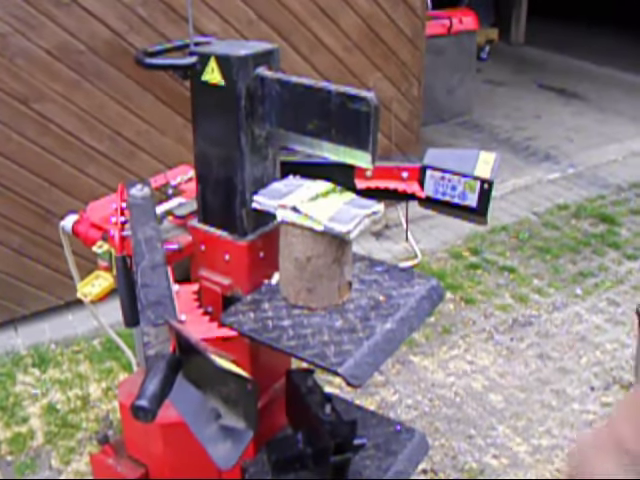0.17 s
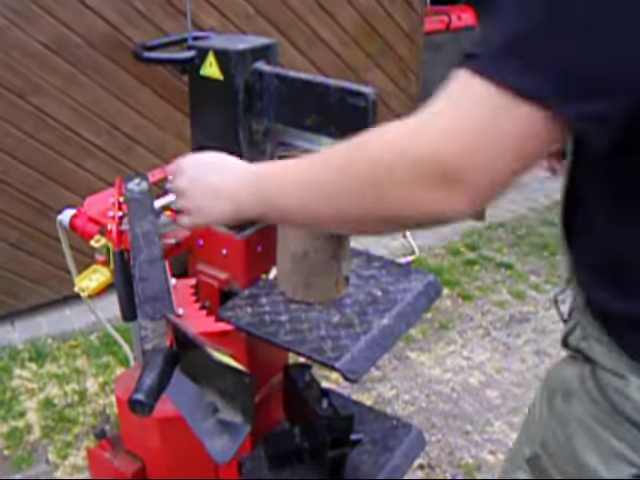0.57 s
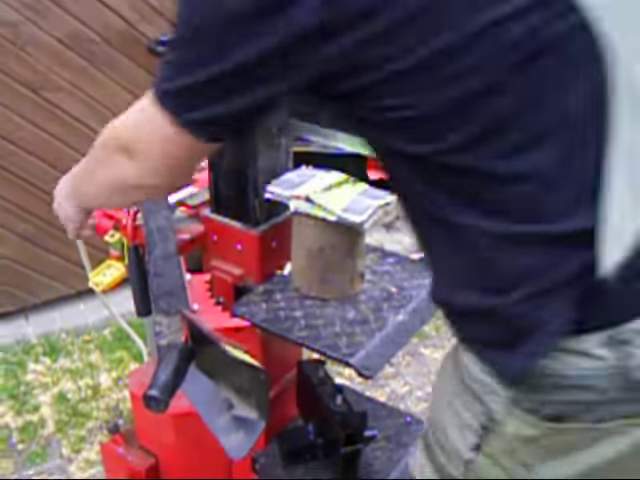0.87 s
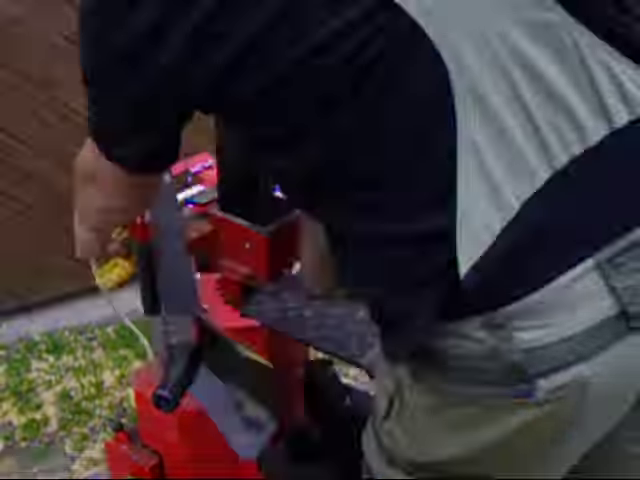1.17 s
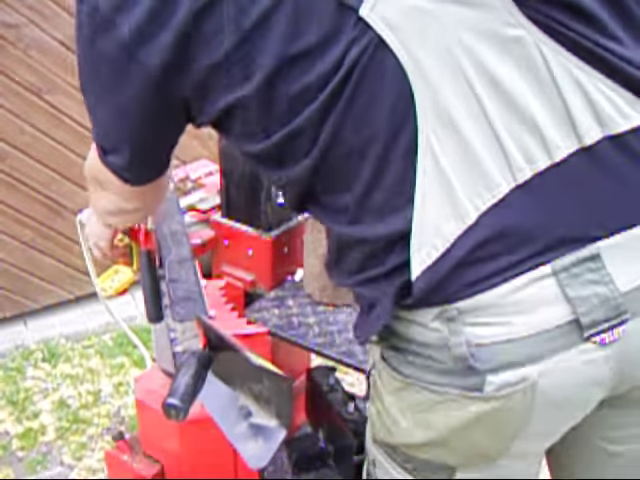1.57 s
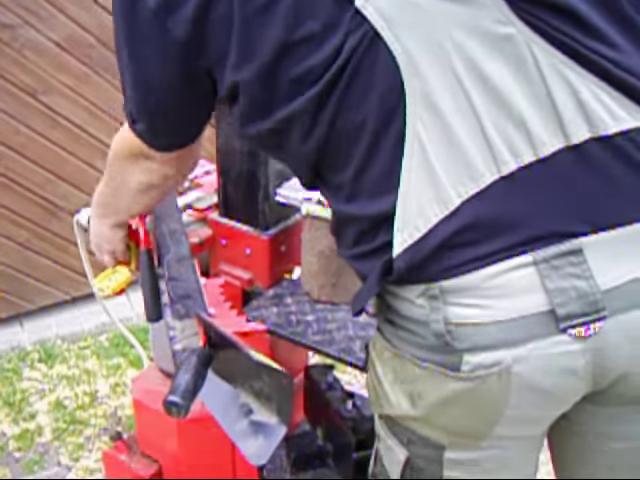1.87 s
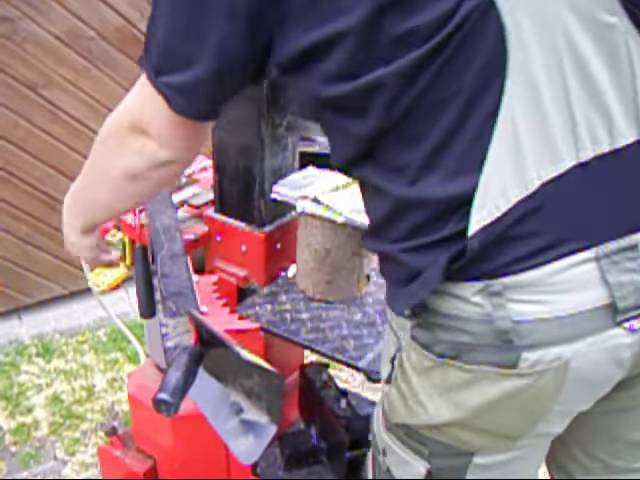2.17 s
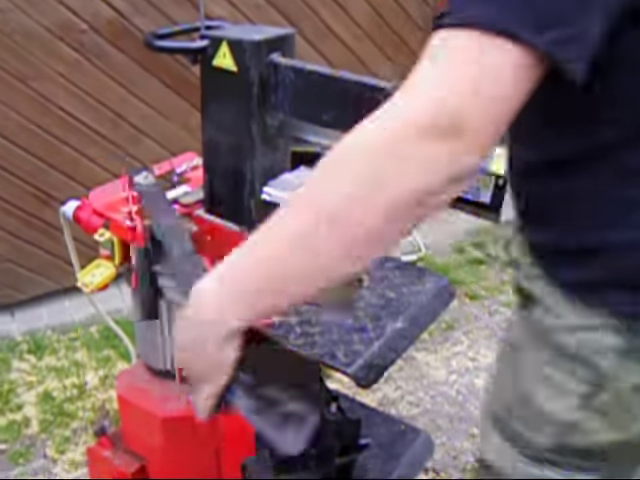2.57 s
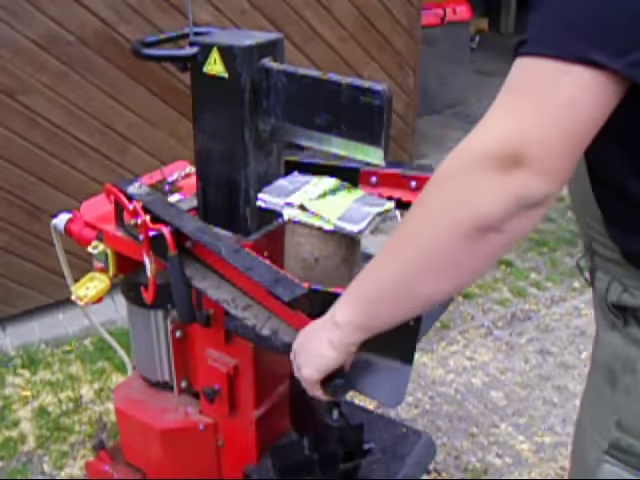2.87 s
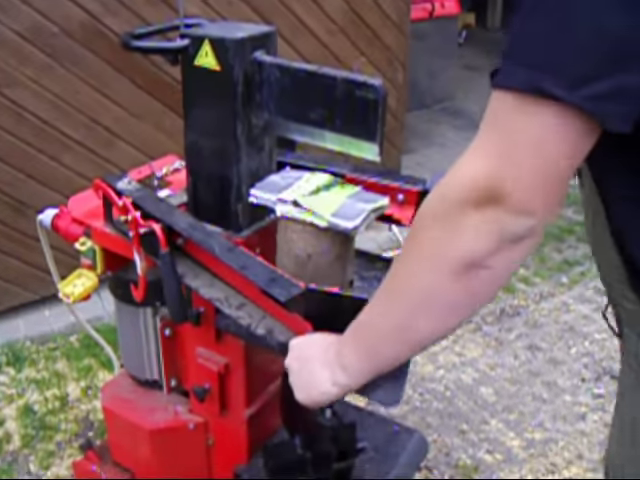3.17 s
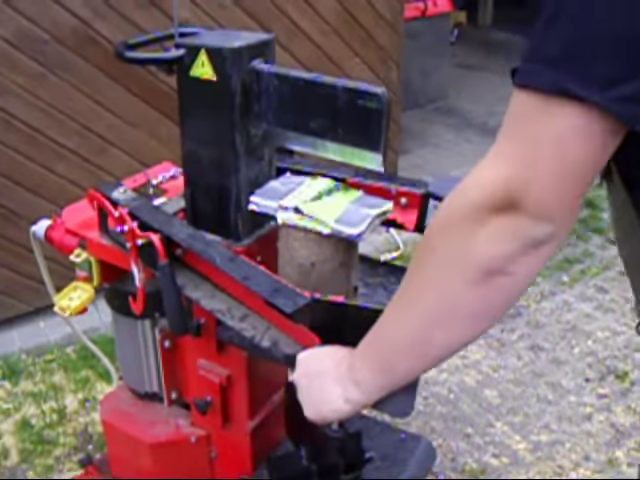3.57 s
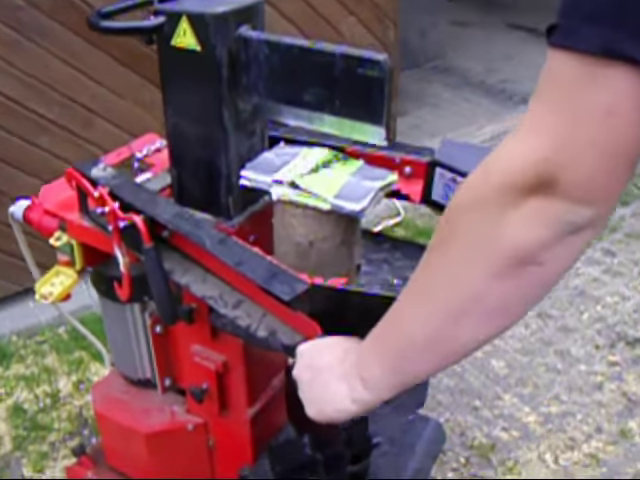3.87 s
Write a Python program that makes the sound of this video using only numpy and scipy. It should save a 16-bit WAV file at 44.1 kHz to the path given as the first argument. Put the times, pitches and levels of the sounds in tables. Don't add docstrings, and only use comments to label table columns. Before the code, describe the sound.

A splitter motor kicks in with loose steel knocks after quiet yard air and a dropout, whines steadily, cuts out briefly, returns with a ringing lever, then clunks and groans under load, harsh lo-fi sound outdoors.

```python
import sys
import numpy as np
from scipy import signal
from scipy.fft import rfft, irfft
from scipy.io import wavfile

SR = 44100
rng = np.random.default_rng(int(sys.argv[2]) if len(sys.argv) > 2 else 0)


def to_wav(s):
    ch = np.atleast_2d(s).T
    pcm = np.round(np.clip(ch, -1, 1) * 32767)
    wavfile.write(sys.argv[1], SR, pcm.astype(np.int16))


def to_linear_factor(level_db):
    exponent = np.asarray(level_db, float) / 20
    return 10 ** exponent


N = 176400
T = np.arange(N) / SR
SAMPLE_HZ = 8000


def evened(x):
    return x / np.sqrt(np.mean(x ** 2) + 1e-20)


def coloured(points):
    f, db = np.transpose(points)
    hz = np.fft.rfftfreq(N, 1 / SR)
    gain = to_linear_factor(np.interp(np.log(hz + 1), np.log(f), db)) * (hz < SAMPLE_HZ / 2)
    return evened(irfft(rfft(rng.standard_normal(N)) * gain, N))


def drift(hz):
    lowpass = signal.butter(2, hz, fs=SR, output="sos")
    return evened(signal.sosfilt(lowpass, rng.standard_normal(N + SR))[SR:])


def resonate(x, hz, width_hz):
    turn = np.exp(2j * np.pi * hz * np.arange(len(x)) / SR)
    r = np.exp(-np.pi * width_hz / SR)
    return 2 * (turn * signal.lfilter([1 - r], [1, -r], x / turn + 1e-18)).real


def twice_resonated(x, hz, width_hz):
    return evened(resonate(resonate(x, hz, width_hz), hz, width_hz))


def add(mix, s, sound):
    part = mix[round(s * SR):][:len(sound)]
    part += sound[:len(part)]


def air():
    # f/Hz, level/dB per Hz
    spectrum = [(12, -30.5), (20, -17.5), (71, -4.5), (306, -5.5), (327, -6.5), (487, -6.5), (679, -9),
                (968, -8), (4000, -20), (5200, -57), (8800, -120)]
    # t/s, level/dB
    swell = [(0, -.5), (.5, -0.5), (1, 0), (1.2, 0), (1.5, 1), (1.8, 2.5), (4, 3.5)]
    # f/Hz, width/Hz, level/dB
    machinery = [(486, 6.6, -52), (935, 13, -58)]
    out = to_linear_factor(-42 + np.interp(T, *np.transpose(swell))) * coloured(spectrum)
    for hz, width_hz, db in machinery:
        out += to_linear_factor(db) * evened(resonate(rng.standard_normal(N), hz, width_hz))
    return out


def wind():
    # t/s, level/dB
    wind_level = [(0, -34), (.15, -47.5), (.3, -39.5), (.48, -47.5), (.7, -43.5), (.9, -49), (1.2, -60),
                  (1.8, -52), (2.1, -52.5), (2.23, -41), (2.55, -49), (2.7, -39), (3.1, -50), (4, -43.5)]
    wind_hz, gust_db = 55, 2
    lumps = resonate(resonate(rng.standard_normal(N), wind_hz, 90), wind_hz, 100)
    lumps = lumps * to_linear_factor(gust_db * drift(12))
    return to_linear_factor(np.interp(T, *np.transpose(wind_level))) * evened(lumps)


def birds():
    # start t/s, length/s, from f/Hz, to f/Hz, level/dB
    chirps = [(.155, 0.069, 2380, 2640, -54.5), (.274, 0.038, 3990, 3650, -57),
              (.32, 0.063, 3640, 3450, -57), (.365, 0.048, 3480, 3600, -60),
              (0.525, 0.032, 3130, 3450, -60), (0.558, 0.045, 3500, 3850, -57),
              (.598, 0.041, 3800, 3650, -62), (0.79, .045, 3750, 3280, -69),
              (1.015, 0.044, 3700, 3830, -67), (1.055, 0.055, 3740, 3680, -56.5),
              (1.105, 0.11, 3770, 3590, -60), (3.818, 0.078, 3900, 3860, -43.5)]
    wobble_hz, bend = 45, .6
    out, wobble = np.zeros(N), drift(60)
    for s, length_s, from_hz, to_hz, db in chirps:
        u = np.arange(0, 1, 1 / (length_s * SR))
        hz = from_hz + (to_hz - from_hz) * u ** bend
        hz = hz + wobble_hz * wobble[round(s * SR):][:len(u)]
        whistle = np.sin(2 * np.pi * np.cumsum(hz) / SR)
        add(out, s, to_linear_factor(db) * 2 * np.sqrt(np.sin(np.pi * u)) * whistle)
    return out


def shaft_orders(turns, load, hum_db, upper_db):
    orders = [12, 13, 23, 24, 25, 32, 35, 36, 37, 38, 39, 40, 42, 48, 58, 59, 60, 61, 62, 63, 70, 71, 72,
              73, 97]
    free_db = [-2, -10.5, -10, -19, -10.5, -17, -19, -5, -5, -16, -5.5, -12.5, -19.5, -16, -33, -19.5,
               -30.5, -15, -18, -30, -27, -15.5, -17.5, -25.5, -18]
    loaded_db = [-6.5, -14, -15.5, -11.5, -19.5, -11.5, -4.5, -2.5, -12, -20.5, -27, -25, -33, -23.5, -9,
                 -18, -17, -15.5, -51, -17, -18.5, -7.5, -15, -13.5, -22.5]
    waver_db, waver_hz, slack_turns = 1.1, 6, .04
    slide_bend, slide_lead = .085, .08
    running_free = np.clip(4 * (.6 - load), 0, 1)
    waver = [drift(waver_hz) for _ in range(4)]
    slack = slack_turns * (1 - load)
    out = np.zeros(N)
    for k, free, loaded in zip(orders, free_db, loaded_db):
        off = k - 36
        slide = (slide_bend * off ** 2 + slide_lead * off + .5) % 1 - .5
        slide = running_free * slide * (abs(off) < 7)
        base_db, steadiness = (hum_db, .3) if k == 12 else (upper_db, 1)
        level_db = base_db + free + (loaded - free) * load + waver_db * waver[k % 4] * steadiness
        phase = k * turns - k * k / 144 + rng.uniform(0, .1)
        phase = phase + slack * waver[(k + 1) % 4] + slide
        out -= np.sqrt(2) * to_linear_factor(level_db) * np.cos(2 * np.pi * phase)
    return out


def pump_surges():
    # middle t/s, length/s, f/Hz, level/dB
    surges = [
        (3.342, 0.073, 312.5, -30),
        (3.425, 0.054, 302, -34.5),
        (3.487, .06, 330.4, -31.5),
        (3.551, 0.074, 285.4, -26),
        (3.666, 0.053, 294, -25),
        (3.73, 0.036, 338, -29.5),
        (3.767, 0.028, 316, -29),
        (3.835, 0.093, 303.1, -27.5),
        (3.882, .05, 334, -31.5),
        (3.957, 0.042, 355, -32.5),
    ]
    rough, width_hz = .8, 90
    out = np.zeros(N)
    for middle_s, length_s, hz, db in surges:
        t = T[:round(1.5 * length_s * SR)]
        grit = twice_resonated(rng.standard_normal(len(t)), hz, width_hz)
        tone = np.sin(2 * np.pi * (hz * t + rng.random()))
        add(out, middle_s - t[-1] / 2, to_linear_factor(db) * 2 * np.hanning(len(t)) * (tone + rough * grit) / 1.5)
    return out


def oil_and_frame(turns, load):
    # f/Hz, level/dB per Hz
    oil = [(40, -28.5), (120, -13), (250, -9), (400, -10.5), (800, -5), (1150, -8), (2200, -16.5),
           (4000, -22.5)]
    # f/Hz, width/Hz, level/dB
    frame = [(307, 51, -1), (558, 46, 3), (908, 39, 6), (1537, 44, -4.5), (1837, 53, -2), (1972, 42, -40),
             (2340, 110, -15), (3190, 150, -18), (3900, 27, -15.5)]
    rattle_db, throb, groan_db = -7, .2, -3
    white = rng.standard_normal(N)
    rattle = evened(sum(to_linear_factor(db) * evened(resonate(white, hz, w)) for hz, w, db in frame[1:]))
    rattle = rattle * (1 - throb * np.cos(2 * np.pi * turns))
    groan = twice_resonated(rng.standard_normal(N), 305, 140)
    return coloured(oil) + to_linear_factor(rattle_db) * rattle + to_linear_factor(groan_db) * load * groan


def motor():
    # t/s, main hum level/dB, upper orders level/dB, oil and frame noise level/dB, load 0-1
    course = [(1.83, -56, -49, -48.5, 0.03), (1.85, -28.5, -31, -34.5, 0.03), (1.87, -23.5, -30, -31, 0.06),
              (2.0, -26, -33.5, -36, 0.2), (2.24, -16, -31, -35.5, 0.5), (2.5, -18.5, -30, -29, 0.08),
              (2.8, -21.5, -30.5, -32, 0.02), (3.1, -25.5, -29, -30, 0.07), (3.24, -24, -32, -31, 0.2),
              (3.27, -32.5, -27, -25.5, 1), (3.47, -29, -30, -30.5, 0.89), (3.7, -27, -27.5, -31.5, 0.83),
              (3.85, -59, -27, -26.5, 0.74), (4, -39, -29.5, -31.5, 1)]
    shaft_hz, start_s, spin_up_s, sag, throb_s = 24.95, 1.845, .008, .0012, 3.67
    s, *columns = np.transpose(course)
    hum_db, upper_db, noise_db, load = [np.interp(T, s, c) for c in columns]
    load = np.clip(load, 0, 1)
    speed = 1 - 0.16 * np.exp(-np.maximum(T - start_s, 0) / spin_up_s)
    speed = speed * (1 - sag * load)
    turns = np.cumsum(shaft_hz * speed) / SR
    turns = turns - turns[round(throb_s * SR)] + .5
    tones = shaft_orders(turns, load, hum_db, upper_db) + pump_surges()
    noise = to_linear_factor(noise_db + drift(20)) * oil_and_frame(turns, load)
    return (tones + noise) * (T > s[0])


def knock(level_db, rise_s, t60_s, tilt_db):
    # f/Hz, width/Hz, level/dB
    shake = [(311, 48, 2), (509, 59, -0.5), (613, 110, 9), (767, 110, 9), (930, 24, 5), (1035, 24, 9.5),
             (1660, 50, -1), (2058, 73, -4.5), (2585, 90, -11)]
    crack_db, hiss_db = -16.5, -20.5
    t = np.arange(SR // 3) / SR
    shape = np.minimum(t / max(rise_s, 1e-4), 1) * to_linear_factor(-60 * np.maximum(t - rise_s, 0) / t60_s)
    grit = rng.standard_normal(len(t))
    body = np.zeros(len(t))
    for hz, w, db in shake:
        mode = evened(resonate(resonate(grit, hz, 2 * w), hz, 1.6 * w))
        body += to_linear_factor(db + tilt_db * np.log2(hz / 1000)) * mode
    crack = evened(resonate(grit, 1900, 2900)) * to_linear_factor(0.8 * tilt_db)
    crack = crack * (to_linear_factor(hiss_db) + to_linear_factor(crack_db - 60 * t / .03))
    return to_linear_factor(level_db) * shape * (evened(body) + crack)


def loose_steel():
    # t/s, level/dB, rise/s, t60/s, tilt/dB per octave
    knocks = [(1.83, -23, 0.0071, 0.16, -11), (1.846, -14.5, 0.0034, 0.36, -4),
              (1.861, -11, 0.0024, 0.081, -10), (1.874, -14.5, 0.0019, 0.18, -3.5),
              (1.888, -24, .002, 0.19, -3.5), (1.898, -21, .004, 0.14, -1.5), (2.0, -27, 0.0039, 0.06, 4.5),
              (2.846, -21.5, 0.018, 0.12, -3), (2.887, -18.5, 0.0053, 0.072, 5.5),
              (2.958, -24, .01, 0.11, -11.5), (3.33, -22, .008, 0.14, 8.5), (3.393, -25, 0.0036, 0.17, 7.5),
              (3.511, -20, .01, .15, -3), (3.528, -17, 0.0089, 0.093, 0), (3.545, -18.5, 0.0061, .12, -4.5),
              (3.647, -19.5, .003, 0.046, 4), (3.665, -23, .003, 0.14, -14),
              (3.82, -36.5, 0.0062, 0.18, -3)]
    out = np.zeros(N)
    for s, *row in knocks:
        add(out, s, knock(*row))
    return out


def ring(modes, spread, tilt_db=0, twin_db=-7):
    t = np.arange(SR // 2) / SR
    out = np.zeros(len(t))
    for hz, db, t60_s in modes:
        for down_db in (0, twin_db):
            level_db = db + down_db + tilt_db * np.log2(max(hz / 1000, 1)) - 60 * t / t60_s
            mode_hz = hz * (1 + spread * (2 * rng.random() - 1))
            out += to_linear_factor(level_db) * np.sin(2 * np.pi * (mode_hz * t + rng.random()))
    return out


def lever():
    # f/Hz, level/dB, t60/s
    lever_modes = [(582, -8.5, 0.78), (818, -2, 0.27), (1530, -13.5, 0.75), (1663, 0, 0.23),
                   (1630, -15, 0.23), (1793, -19, .3), (2370, -21, 0.11), (2620, -15.5, 0.23),
                   (3050, -26, .18)]
    tick_db, tick_t60_s = -19, .022
    out, t = np.zeros(N), np.arange(SR // 2) / SR
    add(out, 2.4906, to_linear_factor(-16) * ring(lever_modes, 0.0016, twin_db=-17))
    tick = twice_resonated(rng.standard_normal(len(t)), 1200, 2400)
    add(out, 2.631, to_linear_factor(tick_db - 60 * t / tick_t60_s) * tick)
    return out


def valve_clunk():
    # f/Hz, level/dB, t60/s
    valve_modes = [(247, -13.5, 0.24), (348, -9.5, 0.065), (628, -4.5, 0.06), (725, -2, 0.13),
                   (804, -1, 0.093), (894, 1.5, 0.098), (946, -3.5, 0.11), (1095, -1.5, 0.08),
                   (1166, -1, 0.09), (1597, -5, 0.1), (1643, -6.5, .09), (1912, -1.5, 0.068),
                   (2608, 0, 0.057), (3810, -16.5, 0.1)]
    # t/s, level/dB, crack level/dB, tilt/dB per octave
    blows = [
        (3.241, -39, 9.5, 3),
        (3.2448, -7, 3.5, 4),
        (3.252, -13, -4.5, 0),
        (3.258, -13, -4, -8),
        (3.267, -10.5, -8.5, -13.5),
        (3.28, -22.5, -1, -4),
    ]
    crack_t60_s, spread, rise_s = .06, .012, .0003
    out, t = np.zeros(N), np.arange(SR // 2) / SR
    for s, level_db, crack_db, tilt_db in blows:
        crack = evened(resonate(rng.standard_normal(len(t)), 1900, 1200))
        crack = crack * to_linear_factor(crack_db - 60 * t / crack_t60_s)
        blow = ring(valve_modes, spread, tilt_db, -8.5) + crack
        add(out, s, to_linear_factor(level_db) * np.minimum(t / rise_s, 1) * blow)
    return out


def scrape():
    # from t/s, top t/s, to t/s, level/dB, f/Hz
    drag = (3.77, 3.84, 3.93, -34, 2600)
    from_s, top_s, to_s, db, hz = drag
    swell = np.interp(T, [from_s, top_s, to_s], [0, 1, 0])
    return to_linear_factor(db + 2 * drift(40)) * swell * evened(resonate(rng.standard_normal(N), hz, 2000))


def scene():
    # delay/s, level/dB
    echoes = [
        (.006, -12.5),
        (.013, -24),
        (0.022, -30.5),
    ]
    steel = loose_steel() + lever() + valve_clunk() + scrape()
    for s, db in echoes:
        add(steel, s, to_linear_factor(db) * steel.copy())
    return (air() + wind() + birds() + motor() + steel)[None]


def band_limit(x):
    return signal.sosfilt(signal.butter(12, 11050, fs=SR, output="sos"), x)


def record(dry):
    # from t/s, to t/s, smear level/dB, smear width/Hz
    dropouts = [
        (1.226, 1.4738, -16, 1500),
        (2.2365, 2.4906, -30, 700),
    ]
    offset, offset_s, overload = -0.015, 0.42, 1.04
    push_db, push_s, cut_s, smear_t60_s = -8, .0015, .002, 0.028
    slow = signal.resample(dry[0] + offset * np.exp(-T / offset_s), N * SAMPLE_HZ // SR)
    held = np.clip(slow, -overload, overload)[np.arange(N) * SAMPLE_HZ // SR]
    after = np.maximum(T - dropouts[1][1], 0)
    held = held + to_linear_factor(push_db) * (after > 0) * np.exp(-(after / push_s) ** 2)
    for a, b, smear_db, smear_hz in dropouts:
        gone = np.clip((T - a) / cut_s + .5, 0, 1) * (T < b)
        dull = evened(resonate(rng.standard_normal(N), 600, smear_hz))
        fade = to_linear_factor(smear_db - 60 * np.minimum(abs(T - a) / smear_t60_s, 3) ** 4)
        smear = np.std(held[(T > a - .05) & (T < a)]) * dull * fade
        held = gone * smear + (1 - gone) * held
    band_edge = signal.firwin(601, 10940, window=("kaiser", 9), fs=SR)
    edged = signal.oaconvolve(held, band_edge, "same")
    mix = np.clip(edged, -1, 1)[None]
    return band_limit(mix)


dry = scene()
out = record(dry)
to_wav(out)
```